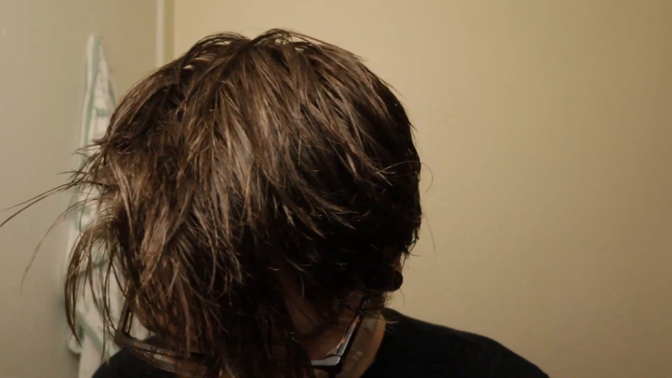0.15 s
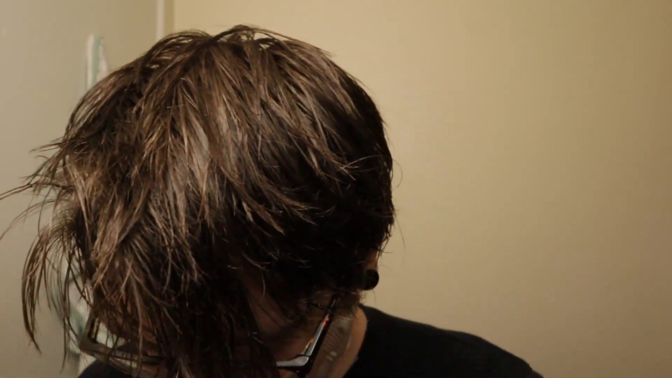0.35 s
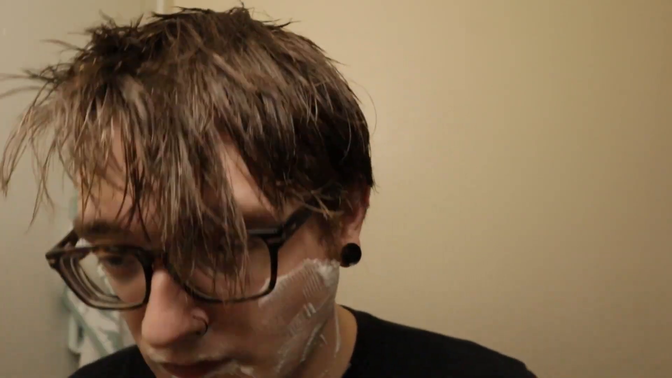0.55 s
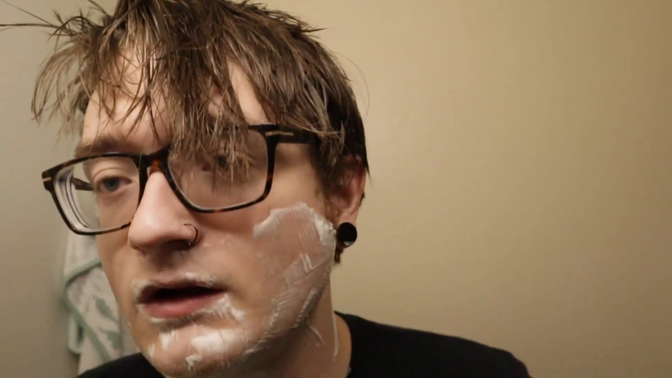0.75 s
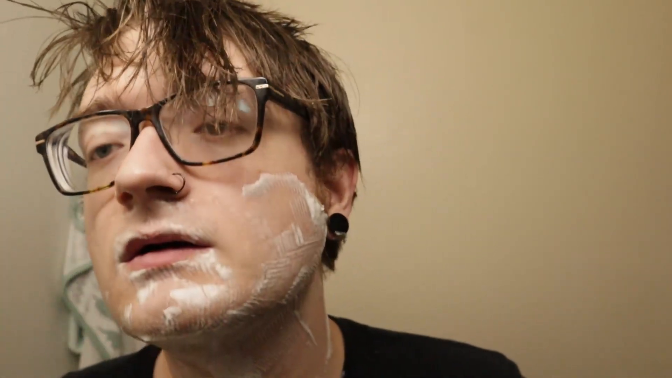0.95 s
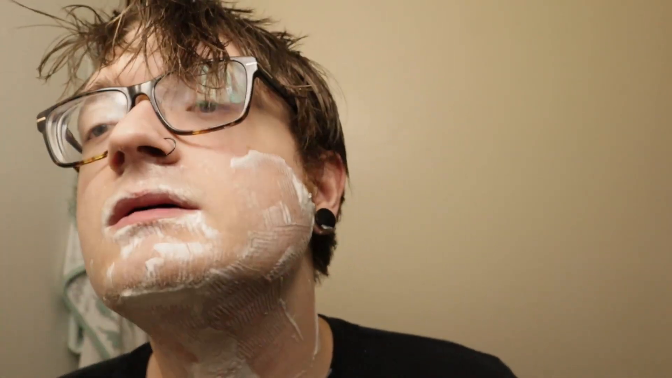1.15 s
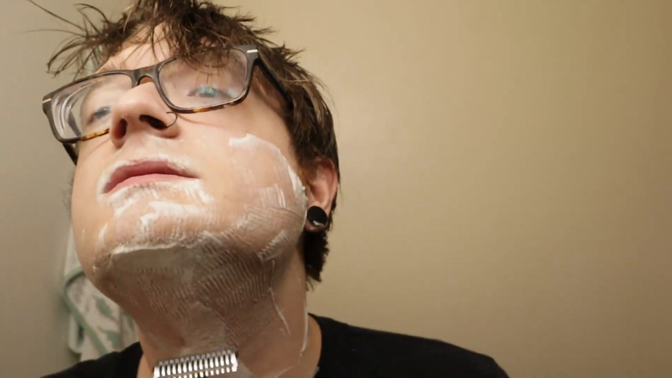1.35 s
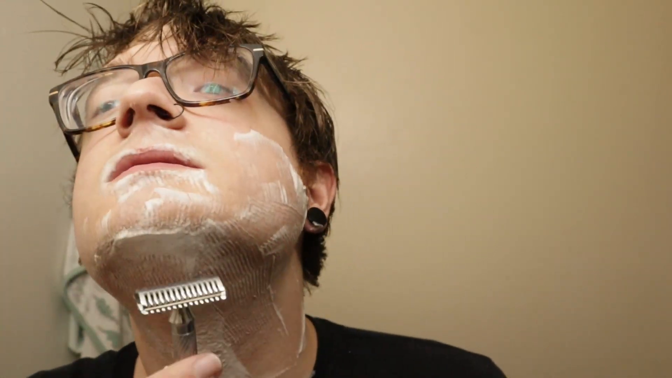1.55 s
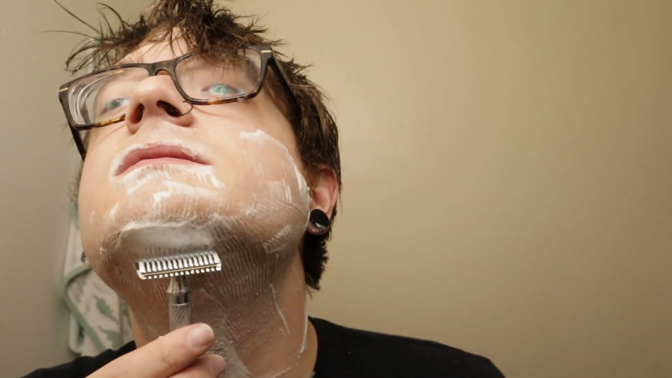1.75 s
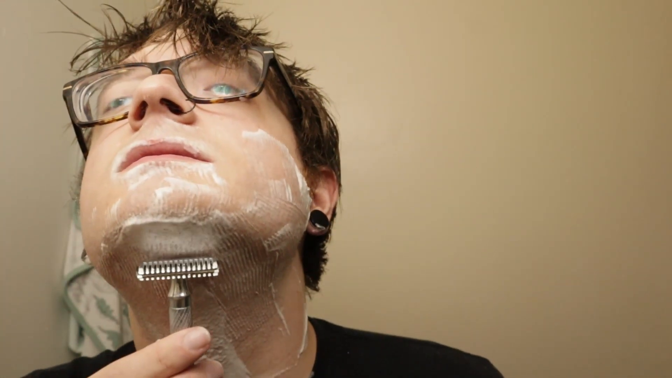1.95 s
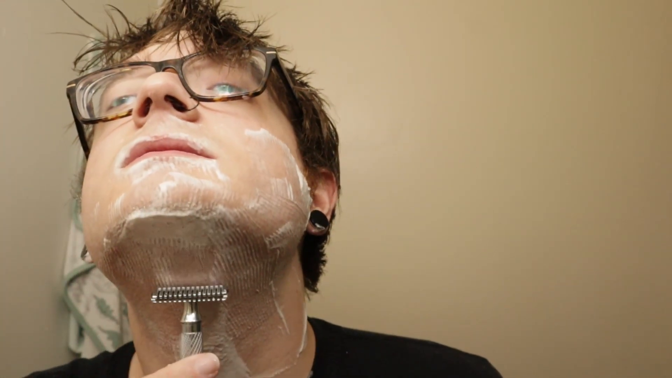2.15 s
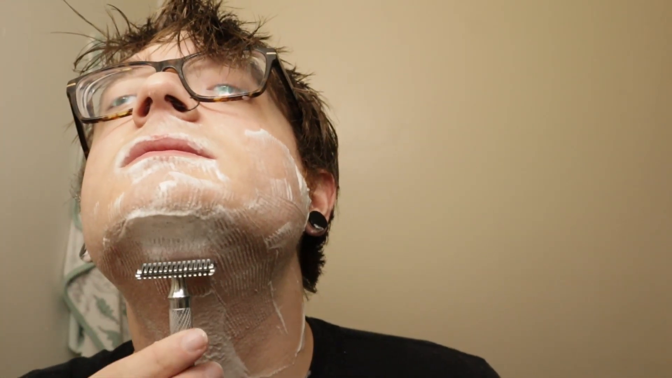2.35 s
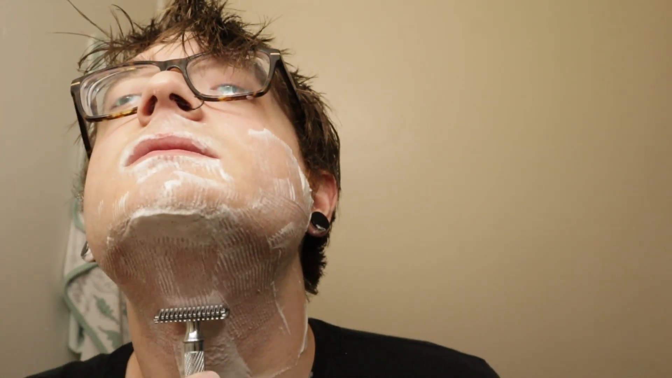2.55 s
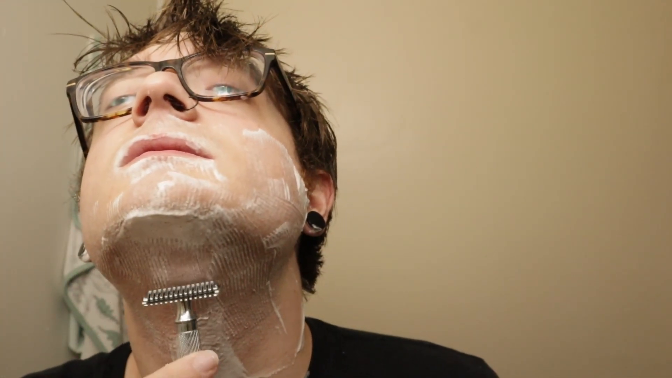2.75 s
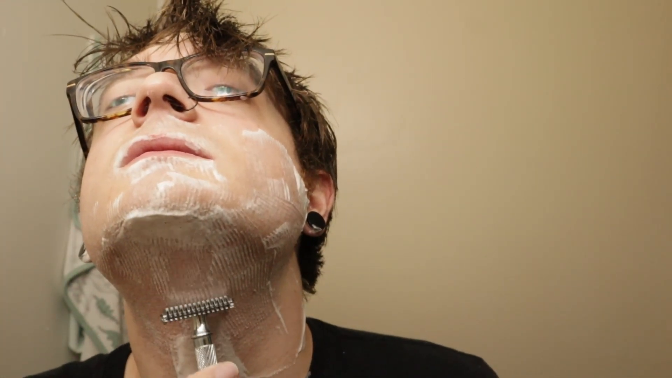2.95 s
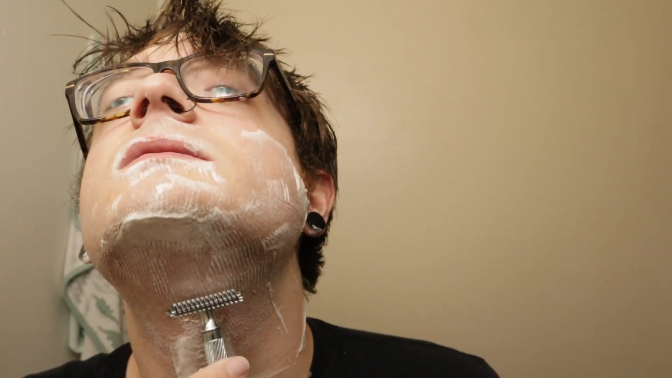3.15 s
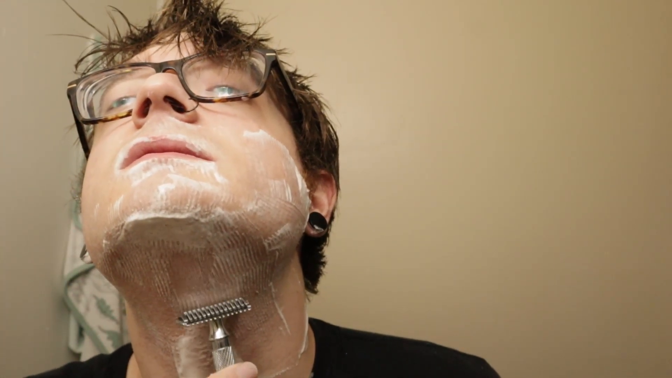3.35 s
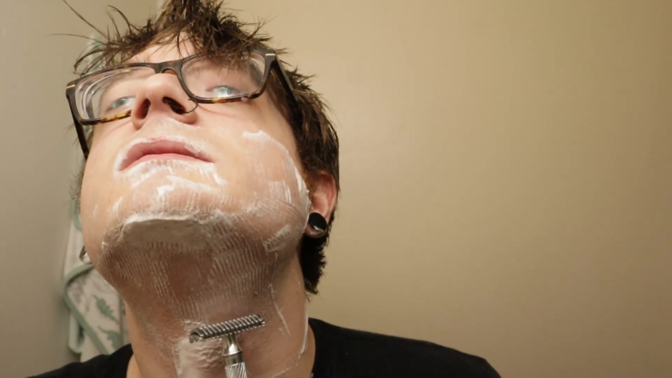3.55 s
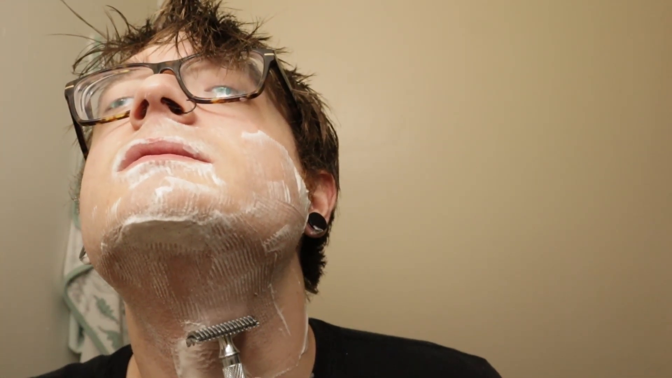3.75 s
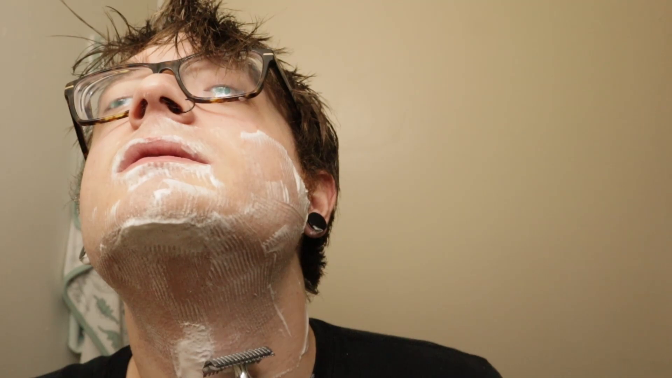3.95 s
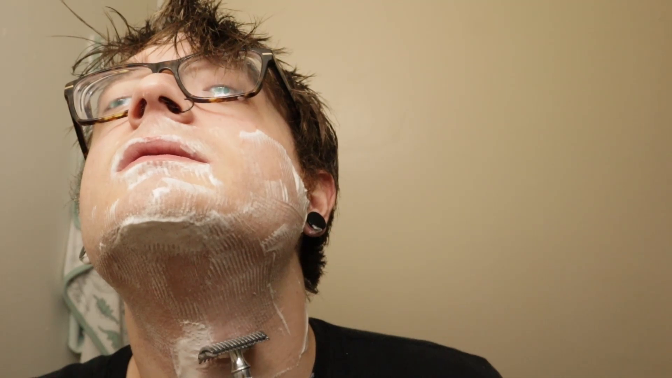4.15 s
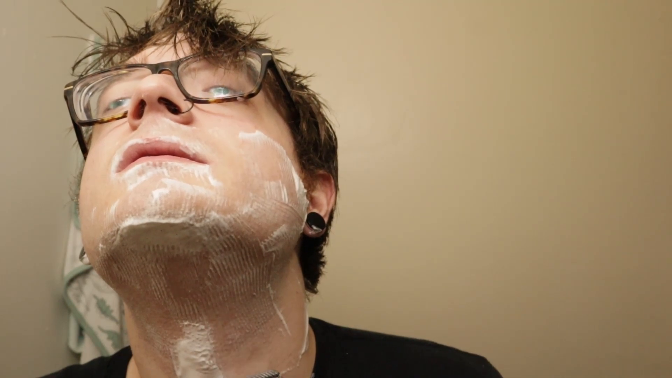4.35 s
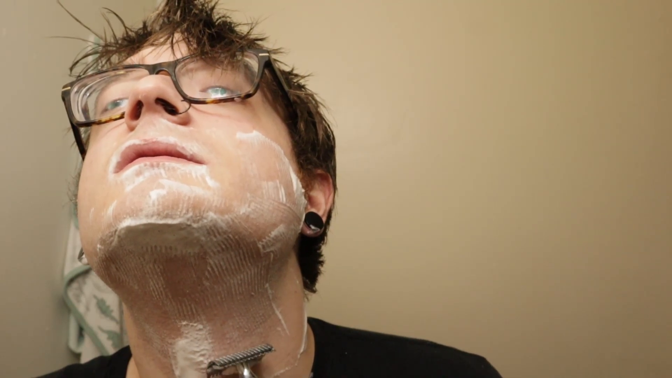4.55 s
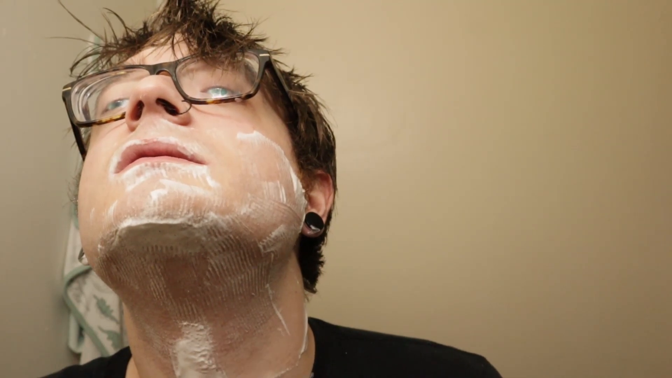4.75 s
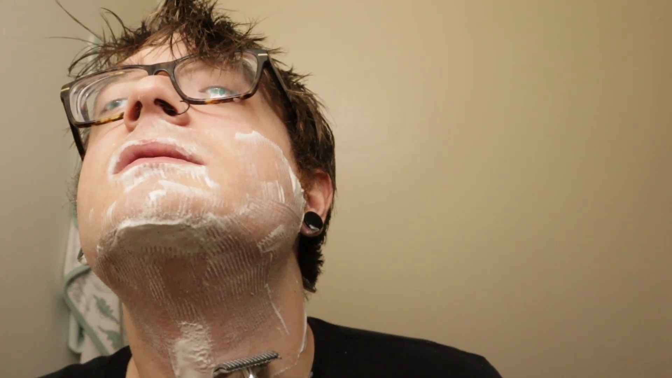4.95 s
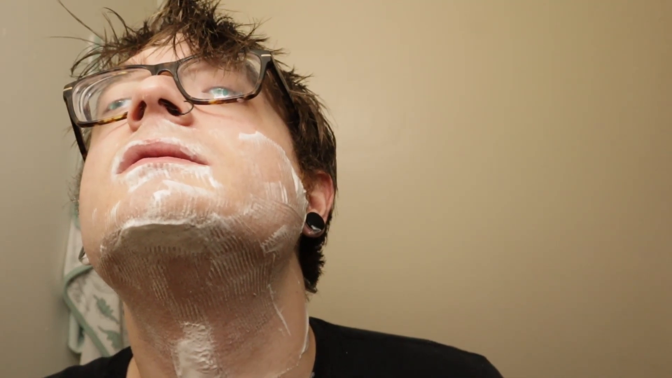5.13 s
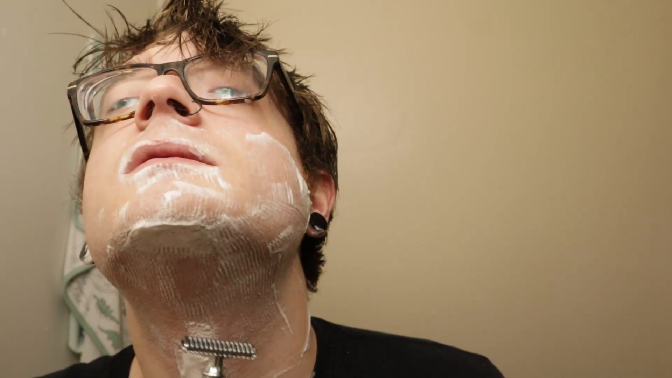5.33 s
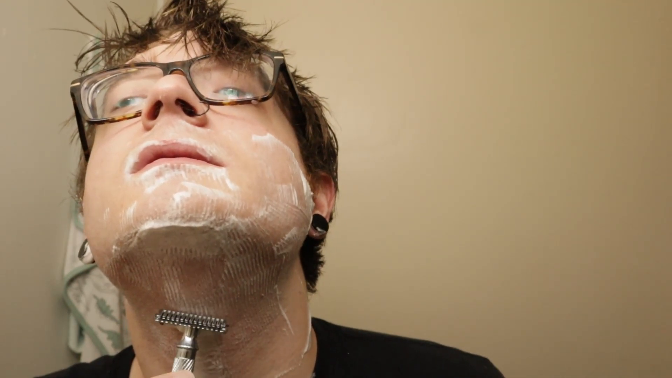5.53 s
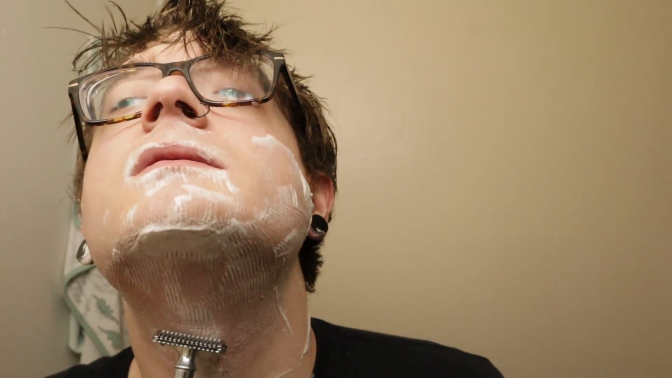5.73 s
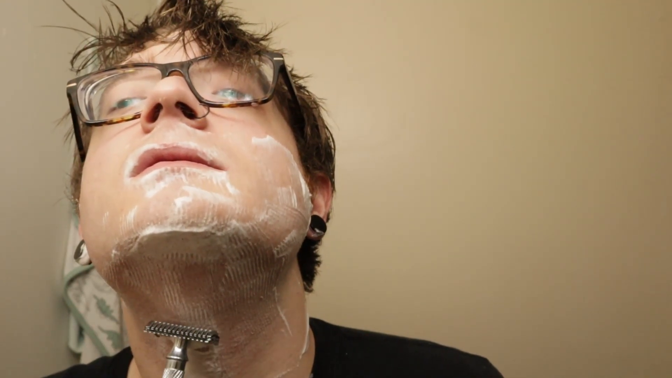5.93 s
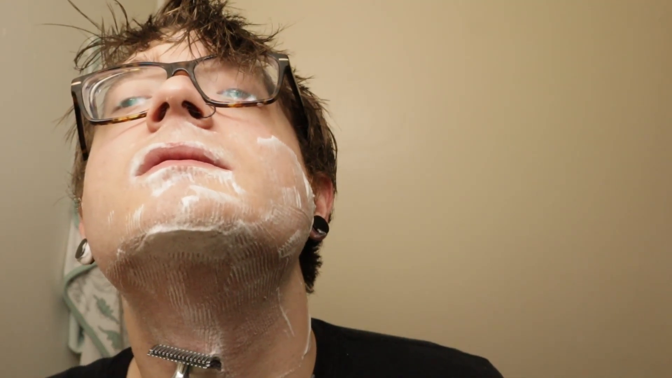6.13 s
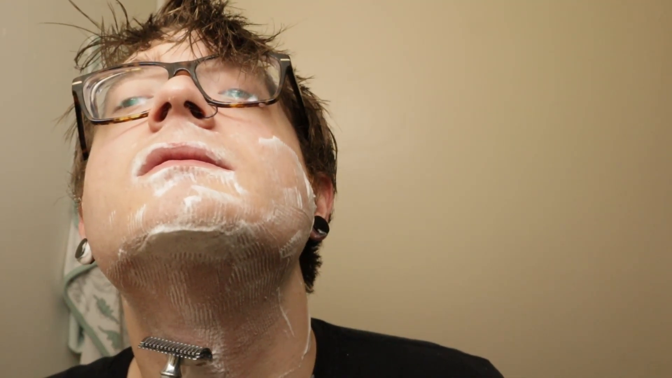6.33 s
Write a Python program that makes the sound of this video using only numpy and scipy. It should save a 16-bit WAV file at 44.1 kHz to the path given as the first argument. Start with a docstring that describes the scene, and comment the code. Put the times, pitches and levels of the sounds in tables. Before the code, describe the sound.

Close in a tiled-sounding small bathroom, thin tap spray stops quickly, leaving sharp splashes, bubbles, soft basin knocks and a brief draining gurgle. After a short pause, a razor rasps bright and gritty through stubble, ten separate strokes of fine ticks with louder hair snaps and a slight metallic ring. A quiet low motor hum lies beneath. The sound sits left; the right holds faint hiss and muffled bass.

```python
"""Wet shave at the basin

A safety razor crackles through neck stubble in ten strokes: random hair ticks ring the edge and the head.
Before it a tap of noise and grains is shut, splashes of dying noise fall and ringing glugs drain the water.
An extractor fan drones below as coloured noise and two tones, in a small bathroom of diffuse echoes.
The microphone feeds the left channel; the right carries a dull bleed of it and its own hiss."""
import sys
import numpy as np
from scipy import signal
from scipy.fft import rfft, irfft
from scipy.io import wavfile
from scipy.ndimage import uniform_filter1d

SR = 44100
rng = np.random.default_rng(int(sys.argv[2]) if len(sys.argv) > 2 else 0)


def generate_wav(sig):
    """Save sig (samples, or channels by samples) to the path in sys.argv[1] as 16-bit PCM at SR."""
    pcm = np.round(np.clip(np.atleast_2d(sig).T, -1, 1) * 32767).astype(np.int16)
    wavfile.write(sys.argv[1], SR, pcm)


N = 281799
T = np.arange(N) / SR

# Razor strokes. Each row: blade bites in seconds, blade eases in seconds, cutting level in dB,
# growth from start to end in dB, pitch of the cut in Hz, razor body level in dB.
STROKES = [(1.985, 2.236, -53.5, 5.5, 10900, -64), (2.524, 2.667, -49, -1.5, 8750, -61),
           (3.003, 3.108, -53.5, -5.5, 10200, -63.5), (3.383, 3.575, -59.5, 4, 10700, -65),
           (3.865, 4.028, -53, -4, 11500, -60), (4.275, 4.402, -56.5, 0.5, 10300, -61.5),
           (4.711, 4.84, -64, 0.5, 10500, -64), (5.107, 5.193, -65.5, 0, 11400, -72),
           (5.765, 5.89, -52.5, -4.5, 11000, -61.5), (6.123, 6.322, -57.5, -7, 11200, -62.5)]
# The loudest single hairs snapping at the blade. Each row: time in seconds, level in dB.
HAIR_SNAPS = [(2.0937, -26), (2.2491, -26), (2.5389, -16), (3.0486, -23), (3.0975, -20), (3.5662, -25),
              (3.8499, -17), (3.8891, -13.5), (3.9041, -15), (3.9535, -18), (4.0209, -25), (4.2576, -26),
              (4.3594, -23), (4.4815, -27), (4.7039, -30), (4.7158, -27), (4.7732, -29), (4.8096, -28),
              (5.1674, -26), (5.1746, -30), (5.751, -24), (5.7959, -19), (5.8163, -19), (5.8707, -19.5),
              (6.0882, -28), (6.2196, -24.5), (6.232, -23), (6.2802, -26)]
# Colour of a cut hair, then of the razor body under it. Each row: frequency in Hz, level in dB.
HAIR_COLOUR = [(2000,-15.5),(4500,-12),(6800,-3),(8200,-0.5),(10000,-0.5),(12000,0),(14000,-0.5),(16000,-6.5)]
BODY_COLOUR = [(900,-22),(2200,-7.5),(2800,3),(3600,-2),(4500,-0.5),(6000,-0.5),(9000,-5)]
# Ring of the razor head, sinking as grip and angle change. Each row: time in seconds, pitch in Hz.
HEAD_RING = [(2.4, 4350), (3.8, 4250), (4.3, 3260), (6.1, 2700)]
# Pressure builds before the bite, arches in mid-stroke and lets go
BITE_DB_PER_S, LIFT_DB_PER_S, MID_STROKE_DB = 278, 334, 2
# Stubble under the first stroke; time in which it thins to 1/e
HAIRS_PER_S, THINNING_S = 1400, 2.7
# Thick hairs among the fine ones, and their level against them
THICK_PER_S, THICK_DB = 47, -8

# Colour of the tap's spray, then of its heavier pour. Each row: frequency in Hz, level in dB.
SPRAY_COLOUR = [(2000,-13),(4200,-2.5),(6300,3.5),(8500,4),(11000,3.5),(13000,3),(15500,-10)]
POUR_COLOUR = [(200,1.5),(350,6.5),(550,-7),(720,-3),(1000,-13.5),(1400,-5),(2100,-2),(2700,-2.5),(3400,3.5),(4200,-12),(7000,-41)]
# The tap is turned down steadily, then shut; the spray stops quickly, the heavier drops dribble on
TAP_SHUT_S, TURN_DOWN_DB_PER_S = 0.32, 28.5
SPRAY_DB, SPRAY_STOP_DB_PER_S = -31, 194
POUR_DB, POUR_STOP_DB_PER_S = -41.5, 35

# Splashes on the basin. Each row: start in seconds, level in dB, 60 dB decay in seconds,
# centre in Hz, width in octaves.
SPLASHES = [(0.037,-30,0.26,6000,1.9), (0.126,-18,0.011,9060,0.44), (.238,-16,0.014,7100,0.46),
            (0.263,-21,0.024,6000,0.88), (0.282,-23,0.038,5900,0.73), (0.342,-25.5,0.032,4300,0.67),
            (0.433,-49,0.18,7600,0.5), (0.505,-32,0.061,4500,0.94), (.513,-19,0.035,3520,1.27),
            (0.724,-41,0.34,9200,2.4), (0.754,-37.5,0.12,2230,0.61), (.815,-39.5,.1,1500,3.8),
            (.842,-27,.046,3100,1.55), (.957,-23,0.038,3330,2.2), (1.006,-35.5,0.015,10900,.15),
            (1.186,-33,0.031,2450,1.64), (1.264,-50.5,0.24,7770,1.05), (1.429,-56,0.2,8100,1.0)]
# A last quick run of faint drips
DRIPS_S, DRIP_GAP_S, DRIP_DB, DRIP_DECAY_S, DRIP_HZ, DRIP_OCTAVES = 1.531, 0.041, -50.5, 0.024, 2400, 0.17

# Colour of the sloshing, then of the fizz. Each row: frequency in Hz, level in dB.
SLOSH_COLOUR = [(120,-21),(190,1),(260,0.5),(320,-2),(450,-8.5),(650,-10.5),(1100,-16.5),(3000,-34)]
FIZZ_COLOUR = [(500,7.5),(1000,-3),(2500,7),(5500,-3.5),(9000,-4),(15000,-18)]
# Hollow of the basin. Each row: frequency in Hz, width in Hz, level in dB.
BASIN_MODES = [(444,71,-2),(710,30,-12),(1032,60,-4.5),(2030,150,-13.5),(2600,97,-20),(3465,39,-16)]
# The water runs off: slosh and fizz swell, fade as the basin empties, and stop
DRAIN_FROM_S, DRAIN_TO_S, EMPTYING_DB_PER_S = 0.494, 1.227, 14
DRAIN_RISE_DB_PER_S, DRAIN_FALL_DB_PER_S = 297, 135
SLOSH_DB, FIZZ_DB = -47, -51.5
# A last seep fizzes on after the flow stops
SEEP_DB, SEEP_DB_PER_S = -13.5, 15
# Meanwhile the pipe draws air, and its note sinks
GURGLE_FROM_S, GURGLE_TO_S, GURGLE_DB = 0.76, 1.1, -49.5
GURGLE_RISE_DB_PER_S, GURGLE_FALL_DB_PER_S = 48, 131
PIPE_HZ, PIPE_SAG_HZ_PER_S = 1533, 740

# Air pockets in the water. Each row: start in seconds, level in dB, pitch in Hz.
BUBBLES = [(.215,-34,217), (0.34,-13.5,2980), (0.626,-33.5,223), (0.686,-29.5,223), (0.723,-35,265),
           (0.846,-21.5,2750), (0.852,-20.5,1475), (1.223,-41.5,238)]
# Ring time at 1 kHz; it shortens with this power of the pitch
BUBBLE_T60_S, BUBBLE_DAMPING = 0.041, 0.66
# Glugs in the waste pipe. Each row: start in seconds, level in dB.
GLUGS = [(0.702, -20), (0.754, -7.5), (.819, 0)]
# What each glug rings. Each row: pitch in Hz, level in dB, 60 dB decay in seconds.
WASTE_MODES = [(363.6,-26,0.13), (735,-29,0.16), (1024,-31.5,.1), (1232,-20.5,.055), (1458,-25,0.048)]
# Clinks of the basin. Each row: start in seconds, level in dB, pitch in Hz, 60 dB decay in seconds.
CLINKS = [(.343,-39,3090,.1), (.343,-35,3290,0.15), (.52,-37,720,.16), (.52,-44.5,2285,0.46)]
# Soft knocks against the basin. Each row: start in seconds, level in dB, pitch in Hz,
# 60 dB decay in seconds.
KNOCKS = [(.135,-36,185,0.14),(.465,-38,54.6,0.21),(.47,-38,130,0.083),(.958,-24,336,0.034),(.97,-41,41.2,0.15)]

# Colour of the fan rumble. Each row: frequency in Hz, level in dB.
FAN_COLOUR = [(15,-29.5),(40,-10),(60,-15.5),(80,-4.5),(105,-2.5),(135,-5.5),(160,-15.5),(195,-14.5),(240,-10),(295,-28.5),(390,-19.5),(550,-30.5),(800,-39.5),(3000,-47.5)]
# Slow level of the motor hum. Each row: time in seconds, level in dB.
HUM_LEVEL = [(0, -52), (3.4, -54), (4.3, -57.5), (5.4, -54), (6.39, -50.5)]
SHAFT_HZ, SHAFT_DB, MOTOR_HZ = 24.8, -55.5, 119.1
# Colour of the left channel's hiss, then of the right's. Each row: frequency in Hz, level in dB.
MIC_HISS = [(300,6),(1000,0.5),(3000,-1.5),(5000,-5.5),(11000,-8),(16000,-16)]
LINE_HISS = [(300,4),(1000,3),(3000,0.5),(8000,-2),(16000,-2.5)]
CUTOFF_HZ = 16000


def razor():
    """The blade cuts hundreds of hairs a second, each a sharp tick that also rings the razor head."""
    snaps, out = np.zeros(N), np.zeros(N)
    for s, db in HAIR_SNAPS:
        snaps[int(s * SR)] = from_db(db)
    for bite, ease, cut_db, growth_db, cut_hz, body_db in STROKES:
        span = (T > bite - 0.1) & (T < ease + 0.17)
        along = np.clip((T - bite) / (ease - bite), 0, 1)
        shape_db = growth_db * (along - 0.5) + MID_STROKE_DB * np.sin(np.pi * along)
        pressure = held(bite, ease, BITE_DB_PER_S, LIFT_DB_PER_S) * from_db(shape_db)
        hairs_per_s = HAIRS_PER_S * np.exp((STROKES[0][0] - bite) / THINNING_S)
        fine = grains(per_s=hairs_per_s, spread_db=5.0)
        thick = from_db(THICK_DB) * grains(per_s=THICK_PER_S, spread_db=5.5)
        cuts = (pressure * (fine + thick))[span]
        ticks = from_db(cut_db) * cuts + snaps[span]
        tugs = from_db(body_db) * cuts + from_db(-16.0) * snaps[span]
        edge = colour(scatter(ticks, near_db=0, near_t60=0.012, tail_db=-11, tail_t60=0.23), HAIR_COLOUR)
        body = colour(scatter(tugs, near_db=13, near_t60=0.02, tail_db=3.5, tail_t60=0.58), BODY_COLOUR)
        # blade angle and skin tension give each stroke its own ring
        head_hz = np.interp(bite, *np.transpose(HEAD_RING))
        head = 0.85 * resonance(body, head_hz, width_hz=600)
        bright = 0.52 * edge + 0.7 * resonance(edge, cut_hz, width_hz=5100)
        out[span] += bright + from_db(-0.3) * (body + head)
    return out


def tap():
    """Fine spray hisses while heavier drops drum on the basin and trap small ringing bubbles."""
    flow_db = -TURN_DOWN_DB_PER_S * T
    shut_for = np.maximum(T - TAP_SHUT_S, 0)
    spray_db = SPRAY_DB + flow_db - SPRAY_STOP_DB_PER_S * shut_for
    pour_db = POUR_DB + flow_db - POUR_STOP_DB_PER_S * shut_for
    # clumps of droplets brighten each band of the hiss at random
    mist = np.zeros(N)
    for hz in np.linspace(2500, 15500, num=9):
        clumps = from_db(1.7 * drift(rate=140))
        mist += clumps * resonance(grains(per_s=1100, spread_db=-0.5), hz, width_hz=4000)
    spray = from_db(spray_db) * rms_one(colour(mist, SPRAY_COLOUR))
    drops = colour(grains(per_s=800, spread_db=2.0), POUR_COLOUR)
    pitches = np.geomspace(1500, 7000, num=16)
    tinkle = rms_one(sum(resonance(grains(per_s=44, spread_db=-2), hz, hz / 35) for hz in pitches))
    return spray + from_db(pour_db) * from_db(1.5) * (drops + tinkle)


def splashes():
    """Each splash or drip is a short dying spatter in its own range of pitch."""
    out, t = np.zeros(N), T[:SR // 4]
    pitches = np.geomspace(100, 20000, 60)
    drips = [(DRIPS_S + k * DRIP_GAP_S, DRIP_DB, DRIP_DECAY_S, DRIP_HZ, DRIP_OCTAVES) for k in range(4)]
    for s, db, decay, hz, octaves in SPLASHES + drips:
        envelope = from_db(db - 60 * t / decay) * (1 - np.exp(-t / 0.00079))
        spatter = rng.standard_normal(len(t)) * envelope
        # a rounded band that falls away on both sides of its centre
        band_db = -10 * np.log10(1 + (np.log2(pitches / hz) / octaves) ** 4 * 4)
        out[int(s * SR):][:len(t)] += colour(spatter, np.c_[pitches, band_db])
    return out


def drain():
    """The trickle sloshes, fizzes, and rings the basin and a hollow pipe note that sinks as water leaves."""
    flow = held(DRAIN_FROM_S, DRAIN_TO_S, DRAIN_RISE_DB_PER_S, DRAIN_FALL_DB_PER_S)
    flow = flow * from_db(-EMPTYING_DB_PER_S * (T - DRAIN_FROM_S))
    seep = from_db(SEEP_DB) * held(DRAIN_TO_S, DRAIN_TO_S, DRAIN_RISE_DB_PER_S, SEEP_DB_PER_S)
    gurgle = held(GURGLE_FROM_S, GURGLE_TO_S, GURGLE_RISE_DB_PER_S, GURGLE_FALL_DB_PER_S)
    trickle = grains(per_s=1100, spread_db=2.5)
    hollow = sum(from_db(db) * rms_one(resonance(trickle, hz, width)) for hz, width, db in BASIN_MODES)
    # slow noise on a sine and a cosine makes a narrow band of noise around the moving pipe note
    pipe_hz = PIPE_HZ - PIPE_SAG_HZ_PER_S * (np.clip(T, GURGLE_FROM_S, DRAIN_TO_S) - GURGLE_FROM_S)
    lowpass = signal.butter(2, 125, fs=SR, output="sos")
    flutter = signal.sosfilt(lowpass, rng.standard_normal((2, N)))
    phase = 2 * np.pi * np.cumsum(pipe_hz) / SR
    pipe = rms_one(flutter[0] * np.sin(phase) + flutter[1] * np.cos(phase))
    slosh = from_db(SLOSH_DB) * noise(SLOSH_COLOUR)
    fizz = from_db(FIZZ_DB) * colour(grains(per_s=1500, spread_db=-7.0), FIZZ_COLOUR)
    return from_db(GURGLE_DB) * gurgle * (pipe + from_db(-1.5) * hollow) + (flow + seep) * (slosh + fizz)


def water_rings():
    """Bubbles ring the shorter the higher they are; glugs ring the waste pipe, and the basin clinks."""
    bubbles = [(s, db, hz, BUBBLE_T60_S * (1000 / hz) ** BUBBLE_DAMPING) for s, db, hz in BUBBLES]
    glugs = [(s, db + mode_db, hz, t60) for s, db in GLUGS for hz, mode_db, t60 in WASTE_MODES]
    return rings(bubbles + glugs + CLINKS, swell_s=0.0015)


def knocks():
    """Soft knocks set the basin ringing as short damped sines."""
    return rings(KNOCKS, swell_s=0.0031)


def fan():
    """Air rumble in the room's low modes, with a steady shaft tone and a motor hum of wavering phase."""
    shaft = from_db(SHAFT_DB) * np.sqrt(2) * np.sin(2 * np.pi * SHAFT_HZ * T)
    hum_db = np.interp(T, *np.transpose(HUM_LEVEL))
    motor = from_db(hum_db) * np.sqrt(2) * np.sin(2 * np.pi * MOTOR_HZ * T + drift(rate=16))
    return shaft + motor + from_db(-50.0) * noise(FAN_COLOUR)


def bathroom(x, echo_db, t60):
    """Direct sound plus dense, dying reflections."""
    t = T[:SR // 2]
    echoes = rng.standard_normal(len(t)) * from_db(-60 * t / t60) * (t > 0.002)
    return x + from_db(echo_db) * signal.fftconvolve(x, echoes / np.linalg.norm(echoes))[:N]


def scatter(clicks, near_db, near_t60, tail_db, tail_t60):
    """Every tick starts at a new spot, so each has its own diffuse echo off face and walls."""
    t = T[:SR // 4]
    near, tail = from_db(-60 * t / np.array([[near_t60], [tail_t60]])) ** 2
    decay = from_db(near_db) ** 2 * near / near.sum() + from_db(tail_db) ** 2 * tail / tail.sum()
    # the echo is fresh noise that follows the power of the ticks
    power = np.maximum(signal.fftconvolve(clicks ** 2, decay)[:len(clicks)], 0)
    echo = np.sqrt(power) * rng.standard_normal(len(clicks))
    return (clicks + echo) / np.sqrt(1 + decay.sum())


def rings(rows, swell_s):
    """Damped sines that swell quickly and die away."""
    out = np.zeros(N)
    for s, db, hz, t60 in rows:
        t = T[:min(SR // 2, N - int(s * SR))]
        envelope = from_db(db - 60 * t / t60) * (1 - np.exp(-t / swell_s))
        out[int(s * SR):][:len(t)] += envelope * np.sin(2 * np.pi * hz * t)
    return out


def resonance(x, hz, width_hz):
    """Two-pole resonance with a gain of 1 on top."""
    r = np.exp(-np.pi * width_hz / SR)
    zeros = np.array([1, 0, -1]) * (1 - r * r) / 2
    poles = [1, -2 * r * np.cos(2 * np.pi * hz / SR), r * r]
    return signal.lfilter(zeros, poles, x)


def grains(per_s, spread_db):
    """Random clicks of uneven size, with a power near 1 over any short stretch."""
    sizes = from_db(spread_db * np.minimum(rng.exponential(1, N), 4)) * rng.choice([-1, 1], N)
    clicks = sizes * (rng.random(N) < per_s / SR)
    local_power = np.maximum(uniform_filter1d(clicks ** 2, size=2000), 0)
    return clicks / np.sqrt(local_power + 1e-4)


def held(start, end, rise_db_per_s, fall_db_per_s):
    """Envelope that rises to 1 at the start, holds, and dies away after the end."""
    return from_db(-rise_db_per_s * np.maximum(start - T, 0) - fall_db_per_s * np.maximum(T - end, 0))


def drift(rate):
    """Slow chance with a spread of about 1, drawn anew this many times a second."""
    return np.interp(T * rate, np.arange(N), rng.standard_normal(N))


def noise(points):
    """Steady coloured noise of rms 1."""
    return rms_one(colour(rng.standard_normal(N + SR), points)[SR:])


def colour(x, points):
    """Causal (minimum-phase) filter of unit power through (Hz, dB) points."""
    hz, db = np.transpose(points)
    grid = np.maximum(np.fft.rfftfreq(8192, 1 / SR), 1)
    gain = rms_one(from_db(np.interp(np.log(grid), np.log(hz), db)))
    # folding the cepstrum forward in time gives the minimum phase
    cepstrum = irfft(np.log(gain))
    half = len(cepstrum) // 2
    folded = np.r_[cepstrum[0], 2 * cepstrum[1:half], np.zeros(half)]
    impulse = irfft(np.exp(rfft(folded)))[:half]
    return signal.fftconvolve(x, impulse)[:len(x)]


def rms_one(x):
    """Scale to an rms of 1."""
    return x / np.sqrt(np.mean(x ** 2) + 1e-20)


def from_db(db):
    """Decibels to gain."""
    return 10 ** (np.asarray(db) / 20)


def scene():
    """All sounds reach one microphone on the left; the right gets a dull bleed of its lows."""
    shave = from_db(0.5) * bathroom(razor(), echo_db=-7, t60=0.072)
    water = bathroom(tap() + splashes() + drain() + water_rings(), echo_db=-7.5, t60=0.13)
    left = shave + water + knocks() + fan() + from_db(-63.5) * noise(MIC_HISS)
    lows = signal.sosfilt(signal.butter(1, 125, fs=SR, output="sos"), left)
    bleed = lows + 0.61 * resonance(left, hz=92, width_hz=101)
    return np.array([left, bleed + from_db(-68.0) * noise(LINE_HISS)])


def record(dry):
    """A steep low-pass cuts the top."""
    return signal.sosfilt(signal.ellip(10, 0.1, 70, CUTOFF_HZ, fs=SR, output="sos"), dry)


dry = scene()
out = record(dry)
generate_wav(out)
```